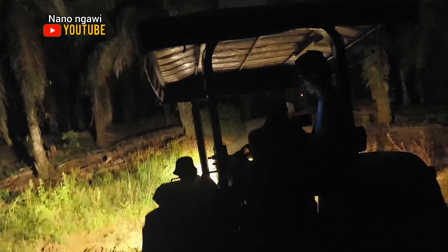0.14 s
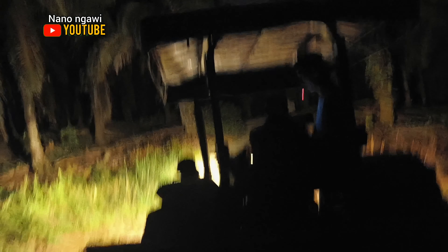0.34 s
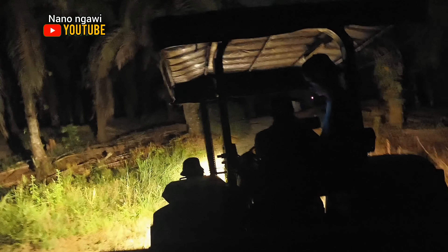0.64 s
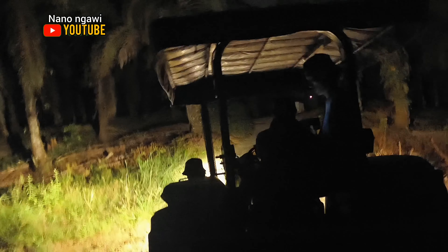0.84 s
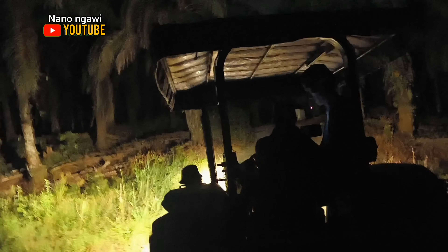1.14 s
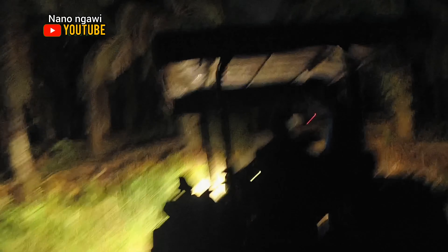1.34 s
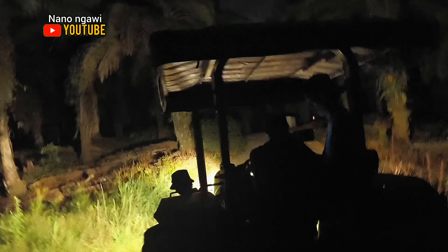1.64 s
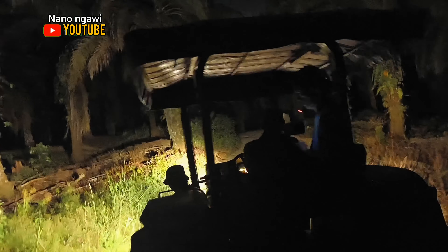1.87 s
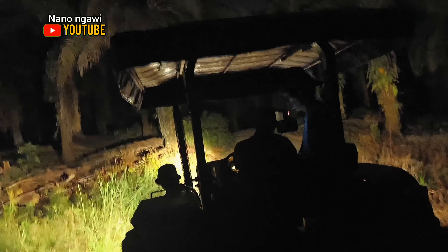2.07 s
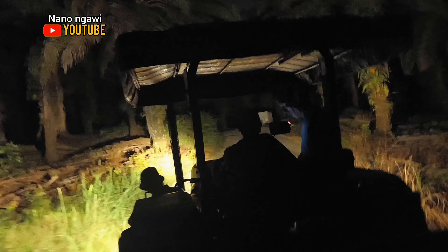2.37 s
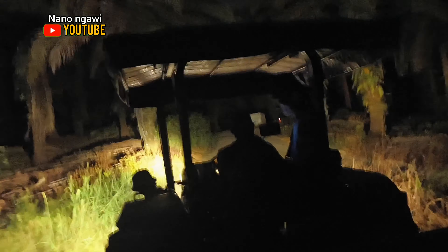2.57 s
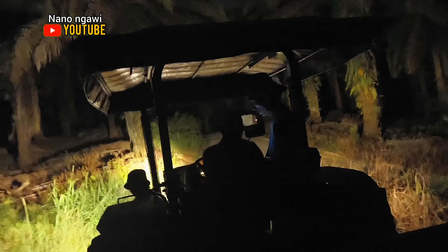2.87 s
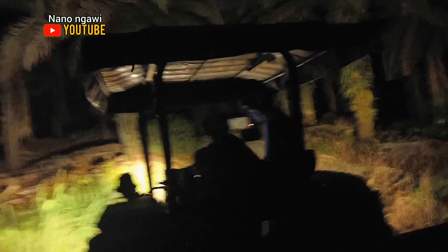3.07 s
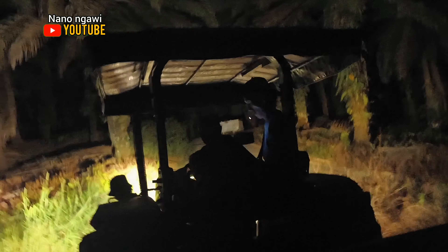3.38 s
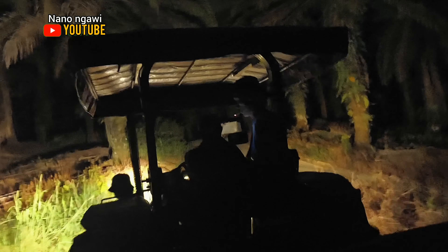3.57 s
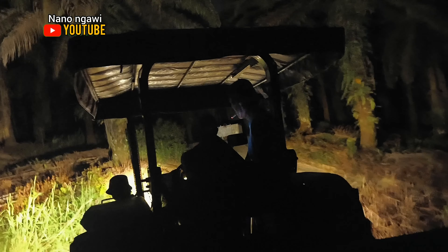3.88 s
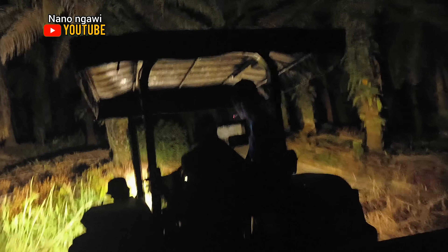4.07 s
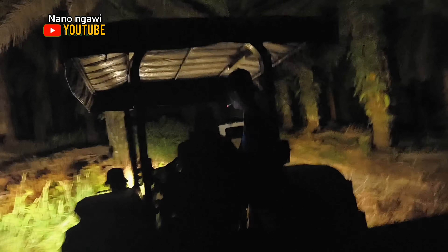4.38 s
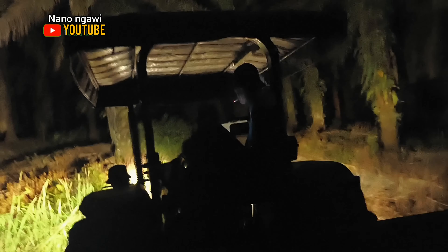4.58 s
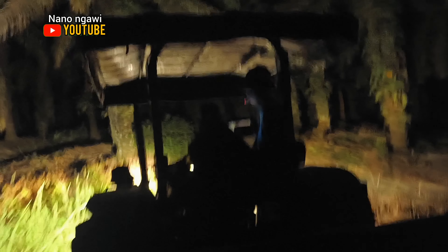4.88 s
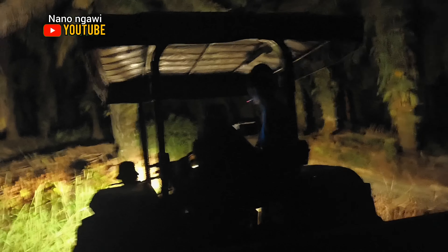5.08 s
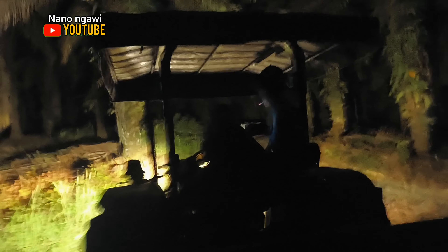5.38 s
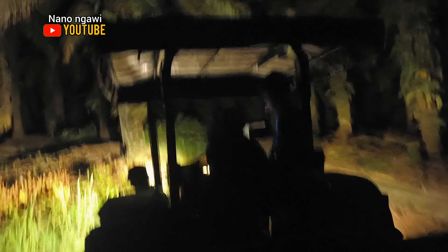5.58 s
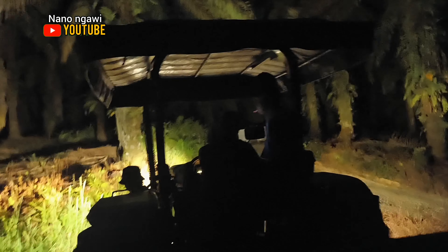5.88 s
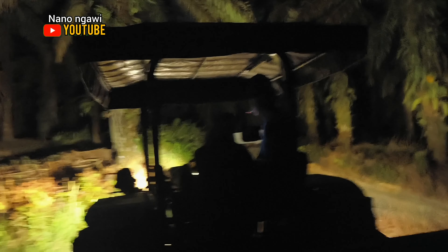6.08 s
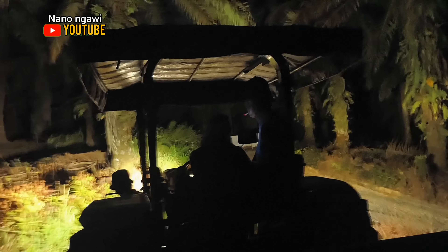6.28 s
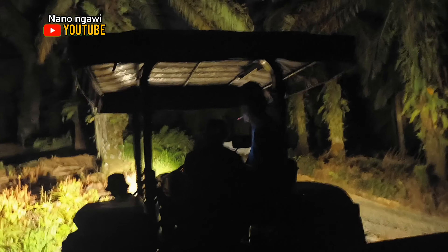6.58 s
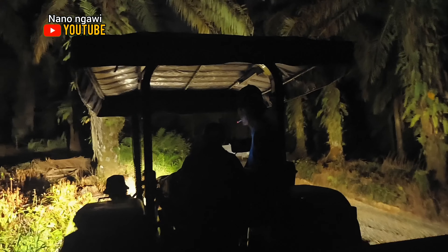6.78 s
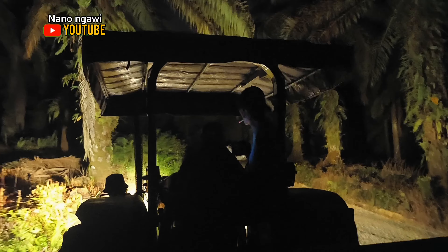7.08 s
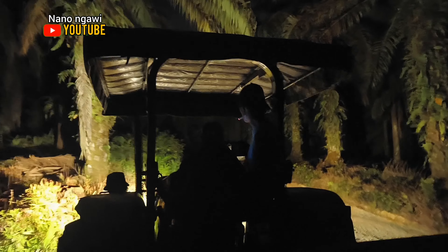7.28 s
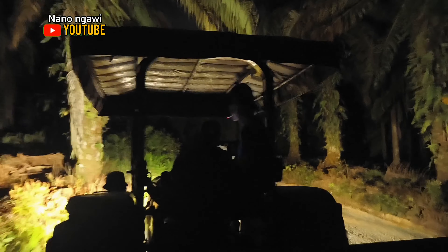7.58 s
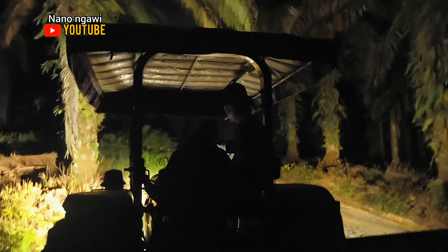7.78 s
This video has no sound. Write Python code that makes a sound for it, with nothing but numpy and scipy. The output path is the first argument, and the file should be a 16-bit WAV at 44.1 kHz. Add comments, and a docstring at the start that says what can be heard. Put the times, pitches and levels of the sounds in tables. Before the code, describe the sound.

Inside a car crawling along a rutted track at night, low cabin boom, suspension knocks and scraping plastic trim over a tractor's diesel hum.

```python
"""Inside a car that crawls along a rutted dirt track, close behind a diesel tractor, for about 8 s.
From the start the ground drives the cabin air into a low boom, the tractor hums and clatters, a thin hiss lies below.
Ruts near 0.6 and 1.5 s swell the boom and panel drumming; knocks of the suspension crowd the first 2 s.
After a sparser stretch, ruts near 4.5 and 6.2 s come with more knocks: ringing joint, decaying body and panel modes.
Loose plastic trim scrapes by dense tiny slips and ticks at random from beginning to end."""
import sys
import numpy as np
from scipy import signal
from scipy.fft import rfft, irfft
from scipy.io import wavfile
from scipy.ndimage import uniform_filter1d

SR = 44100
rng = np.random.default_rng(int(sys.argv[2]) if len(sys.argv) > 2 else 0)


def dump(signal):
    """Clip the signal to [-1, 1] and save it as 16-bit WAV at the path in sys.argv[1]."""
    limited = np.clip(np.atleast_2d(signal).T, -1, 1)
    pcm = np.round(limited * 32767).astype(np.int16)
    wavfile.write(sys.argv[1], SR, pcm)


N = 349713
T = np.arange(N) / SR  # time in s


def amp(db):
    """Decibel definition: amplitude ratio of a level in dB."""
    return 10 ** (np.asarray(db) / 20)


def unit(x):
    """Normalisation: scale to rms 1."""
    return x / np.sqrt(np.mean(x ** 2) + 1e-20)


def noise(size=N):
    """Incoherence: two unrelated white noises, one per channel."""
    return rng.standard_normal((2, size))


def gains(points, size):
    """Spectral envelope: gain of a (Hz, dB) outline at each frequency of a sound of this size."""
    hz, db = np.transpose(points)
    log_bins = np.log(np.fft.rfftfreq(size, 1 / SR) + 1e-9)
    return amp(np.interp(log_bins, np.log(hz), db))


def colour(x, points, size=1024):
    """Minimum-phase filtering: a folded cepstrum gives a causal filter with a (Hz, dB) outline."""
    cepstrum = irfft(np.log(gains(points, size)))
    cepstrum[1:size // 2] *= 2
    cepstrum[size // 2 + 1:] = 0
    impulse = irfft(np.exp(rfft(cepstrum)))
    return signal.fftconvolve(x, impulse[None], axes=1)[:, :x.shape[1]]


def resonate(x, modes):
    """Modal superposition: parallel (Hz, width Hz, dB) resonances of alternating sign."""
    total = 0
    for k, (hz, width, db) in enumerate(modes):
        b, a = signal.iirpeak(hz, hz / width, SR)
        total = total + (-1) ** k * amp(db) * signal.lfilter(b, a, x)
    return total


def fade(t, t60):
    """Exponential decay: a fall of 60 dB in t60 seconds."""
    return np.exp(-np.log(1000) * t / t60)


def ring(t, modes, detune):
    """Free vibration: (Hz, t60 s, dB) modes set going by one blow, each time a little differently."""
    total = 0
    for hz, t60, db in modes:
        pitch = hz * (1 + detune * rng.standard_normal())
        phase = rng.random((2, 1))  # in turns, one per channel
        total = total + amp(db) * fade(t, t60) * np.sin(2 * np.pi * (pitch * t + phase))
    return total


def rise(t, seconds):
    """Exponential onset: approach to full strength with this time constant."""
    return 1 - np.exp(-t / seconds)


def blow(x, db, size=2048):
    """Onset level: set the rms of the first moments of a hit."""
    return x * amp(db) / np.sqrt(np.mean(x[..., :size] ** 2))


def walk(rate):
    """Smoothed random process: a slow wander with a spread near 1, stepping at this rate in Hz."""
    k = int(SR / rate)
    steps = np.repeat(rng.standard_normal(N // k + 1), k)
    return unit(uniform_filter1d(uniform_filter1d(steps, k), k)[:N])


def add(out, s, x):
    """Superposition: mix a short sound in at time s."""
    i = max(int(s * SR), 0)
    out[:, i:i + x.shape[1]] += x[:, :N - i]


# Suspension knocks. Each row: time in seconds, force at the joint in dB, ping pitch in Hz,
# clunk of the stop in dB, thump of the body in dB, thump pitch in Hz.
KNOCKS = [(0.2855, -36, 3490, -40, -24, 77), (0.4989, -24.5, 3560, -25.5, -10.5, 66.8),
          (0.5298, -29, 3640, -28, -12, 97), (1.035, -25, 4080, -34, -14, 74.5),
          (1.3684, -21, 3420, -28, -17, 110), (1.5075, -29, 3540, -40, -18, 73),
          (1.931, -32.5, 3500, -42.5, -21.5, 66), (2.7471, -31, 3800, -37.5, -29, 83),
          (3.435, -41, 3420, -42, -39, 105), (4.1951, -25.5, 3850, -34, -18.5, 64.4),
          (4.383, -19, 3990, -29, -12.5, 76.2), (4.4151, -30, 3580, -37, -22, 51),
          (4.553, -26, 3840, -36, -19, 68.8), (4.7043, -26.5, 3830, -32.5, -20.5, 72.7),
          (5.3841, -33.5, 3470, -41, -29.5, 72), (5.9827, -30, 3370, -38, -19.5, 64),
          (6.176, -23, 3820, -30.5, -11.5, 61.4), (6.3662, -35.5, 3330, -38, -19.5, 54.8)]
# Spectrum of the joint's first touch. Each row: frequency in Hz, level in dB.
TOUCH = [(1000, -8), (3000, 6), (4000, 0.5), (4800, 0), (5900, -3), (7200, -8), (11000, -16.5),
         (16000, -30)]
# Bright ring of the joint. Each row: multiple of the ping pitch, decay time t60 in seconds, level in dB.
PING = [(.76, 0.13, -11.5), (0.879, 0.094, -21), (0.942, 0.066, -1), (1, 0.042, 1.5), (1.052, 0.03, -4),
        (1.5, 0.047, -8.5)]
# Spectrum of the noise in the ping. Each row: frequency in Hz, level in dB.
CRACK = [(1500, -11), (2500, 6.5), (3100, 5.5), (3900, 14.5), (4250, -16), (4700, -9), (5800, -24),
         (7200, -40), (16000, -57)]
# Spectrum of the noise in the clunk. Each row: frequency in Hz, level in dB.
CLUNK = [(200, -2), (700, -2), (1200, 0.5), (2050, 5.5), (2500, -1.5), (4000, -26.5), (16000, -62)]
# Modes of the knocking joint. Each row: frequency in Hz, decay time t60 in seconds, level in dB.
JOINT = [(1260, 0.089, -3), (1470, 0.25, -5), (1700, 0.23, -4), (1864, 0.19, -3.5), (2215, 0.13, -1.5)]
# Modes of the sheet panels, here and in rolling. Each row: frequency in Hz, decay time t60 in seconds, level in dB.
PANELS = [(176.1, 0.56, 2.5), (212.8, 0.89, -2), (293.4, 0.65, 0), (336, 0.24, -7), (447.5, 0.37, -4),
          (476, 0.75, -2.5), (536.5, 0.39, -7), (624.7, 0.55, -4), (691, 0.29, -8.5), (809, 0.34, -22.5)]
# Spectrum of the panels' shudder. Each row: frequency in Hz, level in dB.
PANEL_NOISE = [(70, -12.5), (170, -1.5), (400, -1.5), (700, -2.5), (1100, -11.5), (2000, -28), (4000, -42),
               (16000, -73)]
# Modes of the body's thump. Each row: multiple of the thump pitch, decay time t60 in seconds, level in dB.
THUMP = [(.68, 0.61, -5), (1, .18, 3), (1.45, 0.35, -4.5)]
USUAL_KNOCK_DB = -28.5  # a knock of this force pings and shakes the panels at the following levels
PING_DB, PANEL_DB = -36, -25.5
PANEL_GROWTH = 0.75  # dB per dB of force


def knocks():
    """Impact excitation: a joint touches, then hits its stop; clunk, ping, body thump and panel modes decay freely."""
    out, t = np.zeros((2, N)), T[:int(.7 * SR)]
    for s, force_db, ping_hz, clunk_db, thump_db, thump_hz in KNOCKS:
        harder_db = force_db - USUAL_KNOCK_DB
        touch = colour(noise(len(t)) * rise(t, 0.0035) * fade(t, 0.067), TOUCH)

        onset = rise(t, 0.0021)
        chatter = noise(len(t)) * onset * fade(t, 0.15)
        ping_modes = [(ratio * ping_hz, t60, db) for ratio, t60, db in PING]
        bright = ring(t, ping_modes, detune=0.0096)
        ping = blow(colour(chatter, CRACK), 0) + blow(bright * onset, 0.5)
        clunk = blow(colour(chatter, CLUNK), 0) + blow(ring(t, JOINT, detune=0.0188) * onset, -4.0)

        shudder = colour(noise(len(t)), PANEL_NOISE) * fade(t, 0.4)
        panels = blow(shudder, 0) + blow(ring(t, PANELS, detune=.008), -0.74)
        panels = panels * rise(t, 0.0047)

        shove = 0
        for ratio, t60, db in THUMP:
            shove = shove + amp(db) * fade(t, t60) * np.sin(2 * np.pi * ratio * thump_hz * t)
        thump = blow(-shove * rise(t, 0.0061), thump_db)

        # the touch comes first, the others start within 2 ms of each other
        add(out, s - .007, blow(touch, PING_DB + harder_db - 6.5))
        add(out, s - .0015, blow(ping, PING_DB + harder_db) + blow(clunk, clunk_db))
        add(out, s - .001, blow(panels, PANEL_DB + PANEL_GROWTH * harder_db))
        add(out, s - .003, thump * np.ones((2, 1)))  # alike in both channels
    return out


# Air resonances of the cabin. Each row: frequency in Hz, width in Hz, level in dB.
CABIN = [(27.2, 5.7, -10.5), (43.9, 7.2, -7), (63.1, 16.9, -0.5), (87.1, 21.3, -4.5), (113.8, 22.7, -9)]
# Spectrum of the drumming panels. Each row: frequency in Hz, level in dB.
DRUMMING = [(90, -20.5), (170, 3), (260, -0.5), (400, -3), (600, -12.5), (1000, -17.5), (1800, -29.5),
            (2600, -30.5), (5000, -40.5), (16000, -63)]
# Ruts that set the car shaking. Each row: deepest moment in seconds, build-up in seconds,
# settling in seconds, boom in dB, panel drumming in dB.
RUTS = [(0.56, 0.087, 0.26, -13, -26), (1.46, 0.28, 0.4, -18.5, -29), (4.45, 0.21, 0.33, -14, -27.5),
        (6.2, 0.45, 0.27, -16, -30.5)]
BOOM_DB, DRUM_DB = -25.5, -37  # cabin boom and panel drumming on level ground


def rolling():
    """Forced vibration: rough ground drives cabin air and panels; both swell into each rut and settle after it."""
    boom = resonate(noise(), CABIN)
    band = signal.butter(3, [22, 150], "band", fs=SR, output="sos")
    boom = unit(signal.sosfilt(band, boom))
    # the boom stays fairly even between ruts
    local_power = uniform_filter1d(boom ** 2, size=6000)
    boom = unit(boom / np.sqrt(local_power + 0.68))

    panels = [(hz, 7 / t60, db) for hz, t60, db in PANELS]  # faster decay, wider resonance
    drum = unit(colour(noise(), DRUMMING)) + amp(-5.5) * unit(resonate(noise(), panels))

    heave, shudder = np.zeros((2, N))
    for s, build, settle, boom_db, drum_db in RUTS:
        shake = np.exp(-np.maximum((s - T) / build, (T - s) / settle))
        heave += amp(boom_db) * shake
        shudder += amp(drum_db) * shake
    return boom * np.hypot(amp(BOOM_DB), heave) + drum * np.hypot(amp(DRUM_DB), shudder)


def reflect(x, t60, wet_db):
    """Reverberation: dense, short reflections from windows and dashboard."""
    t = T[:SR // 3]
    tail = noise(len(t)) * fade(t, t60)
    tail = tail / np.sqrt(np.sum(tail[0] ** 2))
    return x + amp(wet_db) * signal.fftconvolve(x, tail, axes=1)[:, :N]


# Strokes of sliding trim. Each row: middle in seconds, length in seconds, level in dB,
# sizzle against that level in dB; levels hold before colouring.
SLIDES = [(0.327, .08, -35.5, -13), (0.711, 0.1, -26, -14), (1.256, 0.13, -35, -14),
          (1.657, 0.07, -37.5, -21), (2.169, 0.036, -29, -15.5), (2.471, 0.055, -35.5, -16),
          (2.965, 0.039, -33.5, -16), (3.846, 0.052, -36, -15), (4.099, 0.062, -31, -20),
          (4.257, 0.031, -34, -15), (4.775, 0.058, -23.5, -17), (5.221, 0.031, -31, -15.5),
          (5.741, .065, -24.5, -14.5), (6.22, 0.053, -26.5, -15.5), (6.657, 0.032, -31, -13.5),
          (7.035, .035, -35.5, -17), (7.371, 0.063, -36, -19), (7.414, 0.022, -32, -10),
          (7.719, 0.12, -34.5, -19), (7.818, 0.023, -21.5, -14)]
# Spectrum of the scrape. Each row: frequency in Hz, level in dB.
SCRAPE = [(300, -7), (1100, -5.5), (1500, 2.5), (2050, 2.5), (2500, -8.5), (3400, -6), (4500, -8),
          (5300, -6.5), (6600, -11.5), (8000, -8), (9500, -13.5), (16000, -35)]
# Resonances of the plastic. Each row: frequency in Hz, width in Hz, level in dB.
TRIM = [(1800, 60, -23), (1950, 46, 4), (2072, 59, 3.5), (4680, 98, -8), (7240, 81, -20), (8170, 110, -18)]
# Spectrum of the sizzle. Each row: frequency in Hz, level in dB.
SIZZLE = [(3000, -35.5), (7000, -16), (10000, 3), (14000, -10), (16000, -9)]
SLIDE_EDGE = 2.9  # 2 is a bell-shaped swell, more holds the pressure longer
CATCH_DB, CATCHES_PER_S = 2.23, 70  # the plastic catches and lets go while it slides
TICKS_PER_S, TICK_DB, TICK_SCATTER_DB, TICK_T60_S = 1.8, -38, 7, 0.042  # levels before colouring
SLIDE_WET_DB, SLIDE_T60_S = -8, 0.31  # the cabin's reflections of the trim


def trim():
    """Stick-slip friction: plastic slides in dense tiny slips that swell and die away; now and then it only ticks."""
    pressure, sharpness, taps = np.zeros((3, N))
    for middle, length, db, sizzle_db in SLIDES:
        stroke = amp(db) * np.exp(-np.abs(2 * (T - middle) / length) ** SLIDE_EDGE)
        pressure += stroke
        sharpness += stroke * amp(sizzle_db)

    slip_sizes = unit(amp(3.8 * rng.exponential(size=N).clip(0, 5)))
    slips = slip_sizes * noise() * amp(1.7 * walk(200))
    slips = slips * amp(CATCH_DB * walk(CATCHES_PER_S))

    # one tick at a random moment of each equal slot of time; slots past the end stay unheard
    for k, (when, strength) in enumerate(rng.random((32, 2))):
        s = (k + when) / TICKS_PER_S
        tick_db = TICK_DB + TICK_SCATTER_DB * (2 * strength - 1)
        taps += amp(tick_db) * (T >= s) * fade(np.abs(T - s), TICK_T60_S)

    rub = slips * pressure + taps * noise()
    sizzle = colour(slips * sharpness + amp(-13) * taps * noise(), SIZZLE)
    sound = amp(5) * colour(rub, SCRAPE) + amp(11) * resonate(rub, TRIM) + amp(7.0) * sizzle
    balance = amp(np.array([[-1.5], [1.5]]))  # stronger on the right
    return reflect(sound, t60=SLIDE_T60_S, wet_db=SLIDE_WET_DB) * balance


# Tones of the tractor exhaust. Each row: multiple of crank speed, level in dB.
EXHAUST = [(1, 0.5), (2, 2.5), (3, -9), (4, -5.5), (5, -19.5), (6, -8.5), (7, -12.5), (12, -15), (15, -14)]
# Spectrum of the engine clatter. Each row: frequency in Hz, level in dB.
CLATTER = [(200, -15.5), (400, 4.5), (650, -8), (860, 2.5), (1080, -6.5), (1260, -1), (1410, -8),
           (1560, -8.5), (2000, -10.5), (2700, -20), (3300, -22.5), (4500, -27.5), (16000, -45)]
# Resonances of the fluttering rattle. Each row: frequency in Hz, width in Hz, level in dB.
FLUTTER = [(1284, 170, 0), (1421, 134, 2.5)]
CRANK_HZ = 29.22  # mean speed
FLUTTER_DB, FLUTTER_DEPTH_DB = -47, 4


def tractor():
    """Harmonic series and amplitude modulation: exhaust tones on the crank speed, clatter pulsing with each turn."""
    speed = CRANK_HZ * (1 + 0.00987 * walk(1.5) + 0.01219 * walk(15))
    turns = np.cumsum(speed) / SR
    hum = 0
    for k, db in EXHAUST:
        level = amp(db + 4.5 * walk(5))
        hum = hum + level * np.sin(2 * np.pi * (round(k) * turns + rng.random()))

    beat = 1 + 0.16 * np.cos(2 * np.pi * turns) + 0.061 * np.cos(4 * np.pi * turns)
    clatter = unit(colour(noise() * beat * amp(1.1 * walk(60)), CLATTER))
    flutter = unit(resonate(noise() * beat, FLUTTER) * amp(FLUTTER_DEPTH_DB * walk(45)))
    whine = unit(resonate(noise(), [(1409.4, 17, 0)]))  # Hz, width Hz, dB

    engine = amp(-29.5) * unit(hum) + amp(-38.0 + 1.23 * walk(2.976)) * clatter
    return engine + amp(FLUTTER_DB) * flutter + amp(-53.0 + 3 * walk(8)) * whine


# Spectrum of the hiss. Each row: frequency in Hz, level in dB.
HISS = [(1000, 2.5), (4000, 0.5), (6900, -1.5), (8000, 7.5), (9000, 3), (12000, -3.5), (16000, -6)]


def hiss():
    """Stationary broadband noise: a thin, steady hiss under everything."""
    return amp(-56.0) * unit(colour(noise(), HISS))


# Difference between the two microphones. Each row: frequency in Hz, side minus mid in dB.
WIDTH = [(30, -17), (80, -21), (140, -18.5), (280, -7.5), (700, -9.5), (1400, -10), (2200, 1.5), (16000, 0)]
# Balance of the two microphones. Each row: frequency in Hz, left minus right in dB.
LEAN = [(60, -0.5), (140, 0.2), (280, -2), (900, -0.5), (1450, -3.5), (2300, -4), (4000, 1.5),
        (16000, -0.5)]


def spread(x):
    """Spatial coherence: long waves reach both sides nearly alike, short ones differently."""
    a, b = rfft(x, 2 * N)
    width, lean = gains(WIDTH, 2 * N), np.sqrt(gains(LEAN, 2 * N))
    mid = a / np.hypot(1, width)
    side = 1j * b * width / np.hypot(1, width)  # a quarter turn of phase
    return irfft(np.array([(mid + side) * lean, (mid - side) / lean]))[:, :N]


def scene():
    """Superposition: car, tractor and hiss share one stereo spread; the trim keeps its own."""
    return spread(knocks() + rolling() + tractor() + hiss()) + trim()


TOP_HZ = 15700


def record(dry):
    """Clipping and band limiting: the microphone overloads beyond full scale; the top is cut."""
    low_pass = signal.ellip(10, .1, 80, TOP_HZ, fs=SR, output="sos")
    return signal.sosfilt(low_pass, np.clip(dry, -1, 1))


dry = scene()
out = record(dry)
dump(out)
```